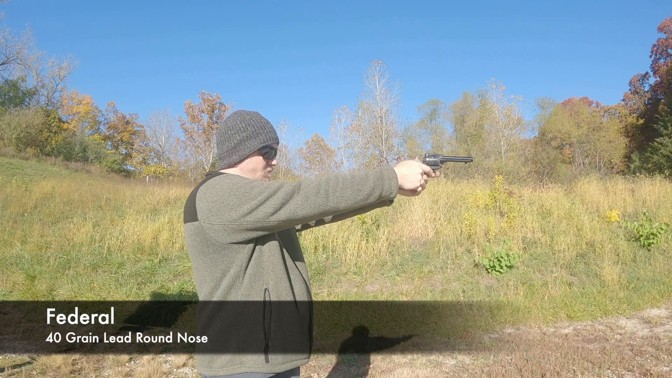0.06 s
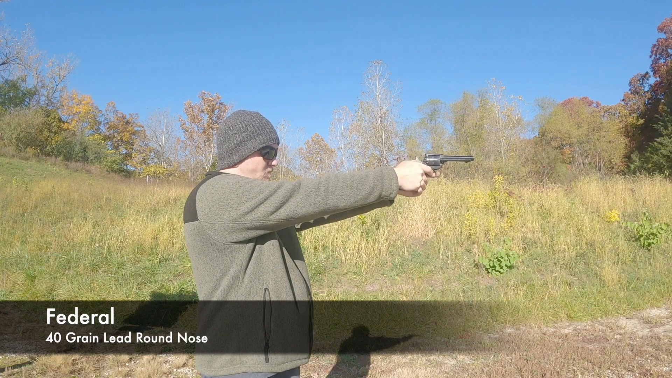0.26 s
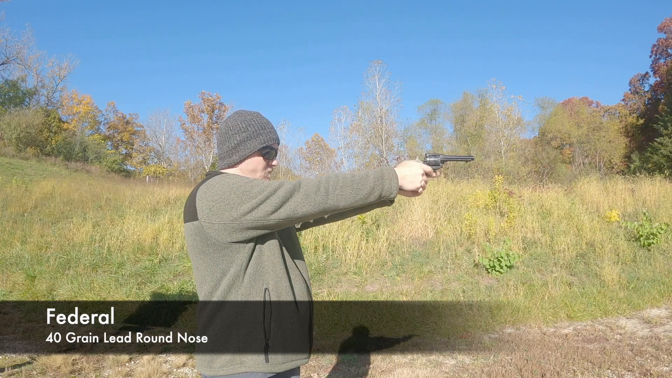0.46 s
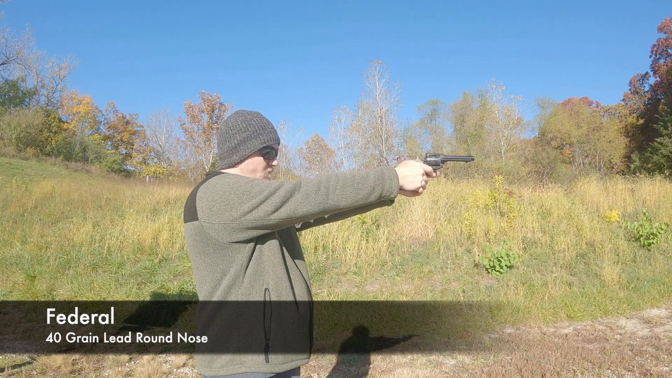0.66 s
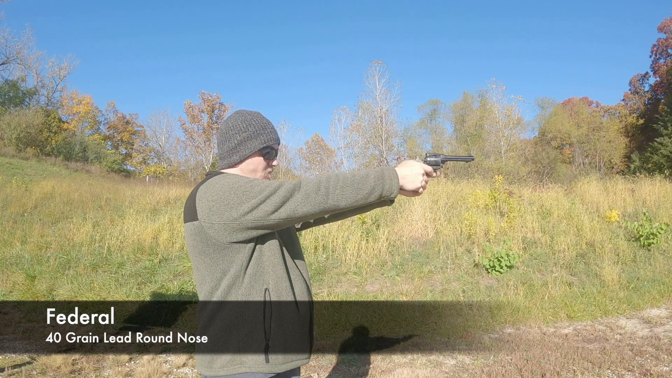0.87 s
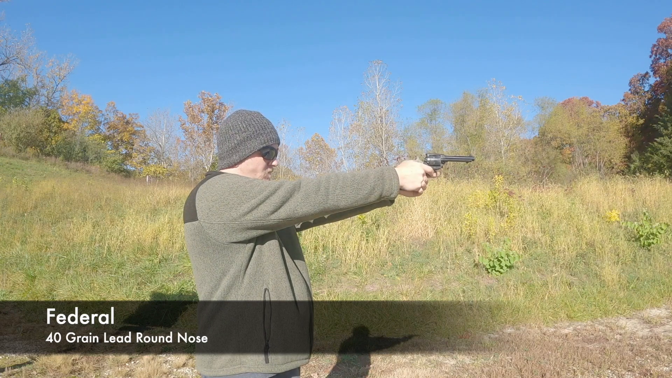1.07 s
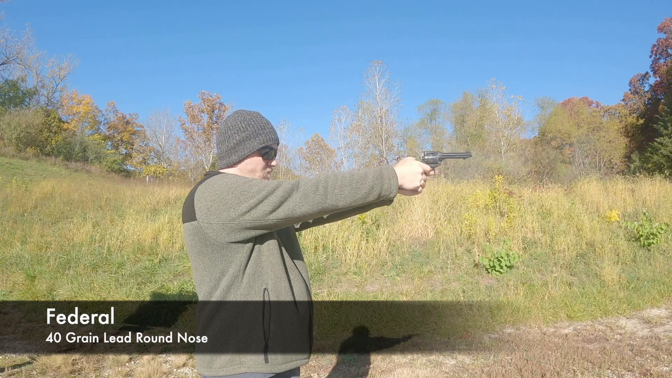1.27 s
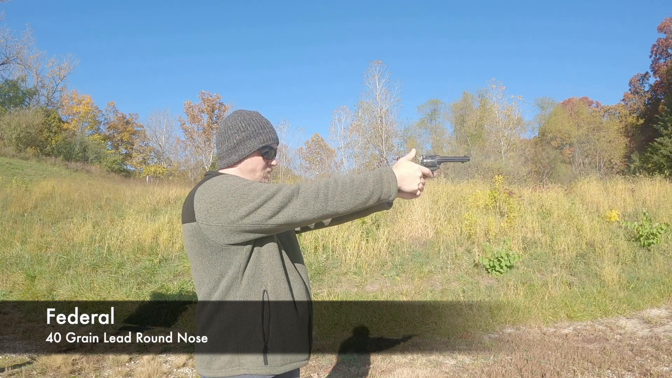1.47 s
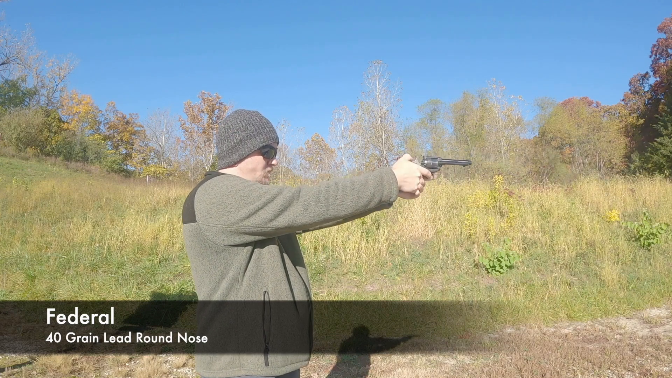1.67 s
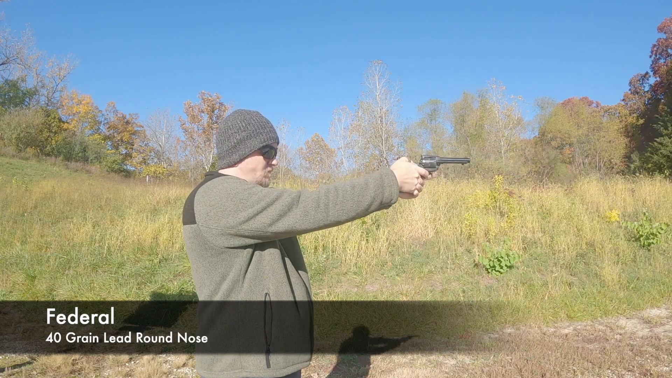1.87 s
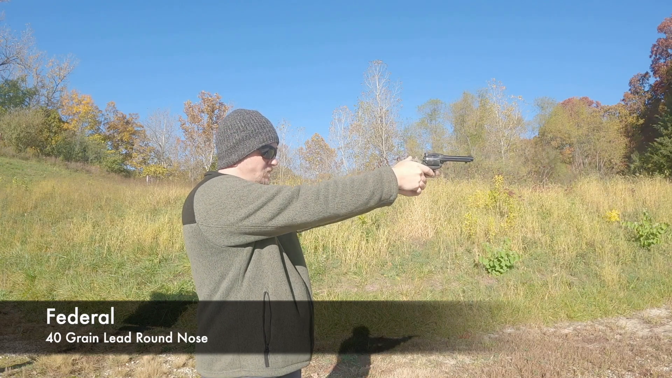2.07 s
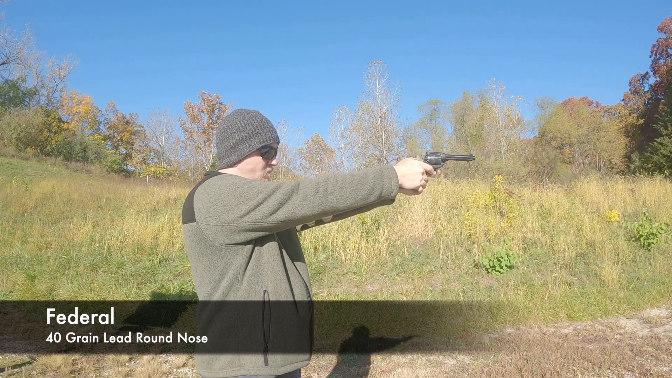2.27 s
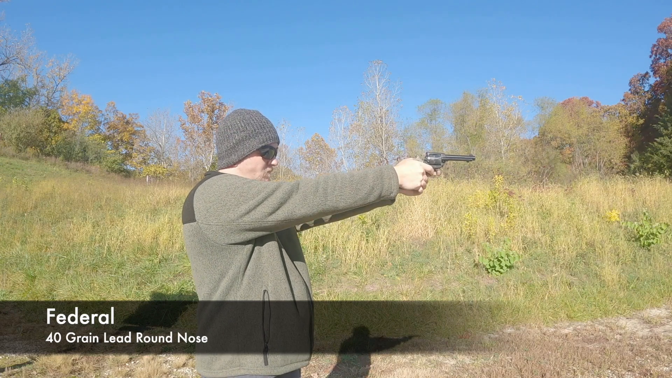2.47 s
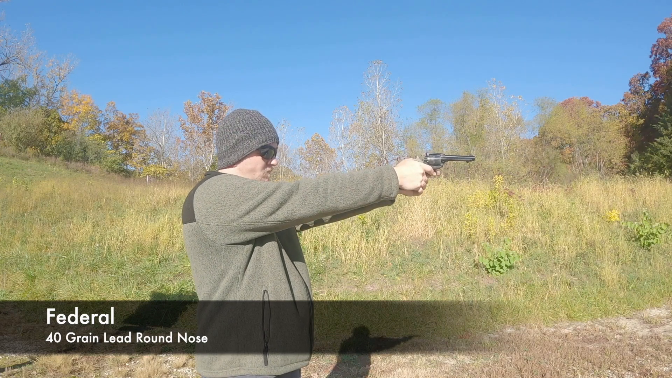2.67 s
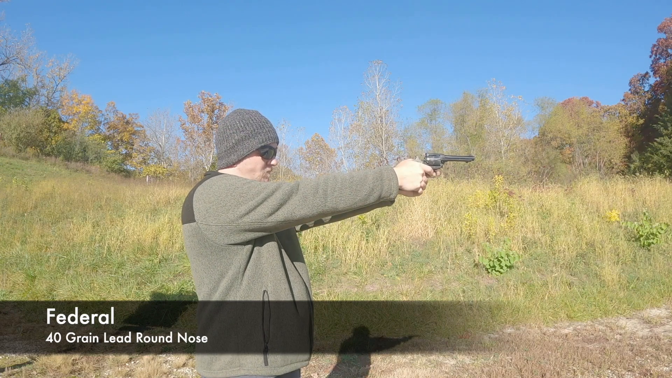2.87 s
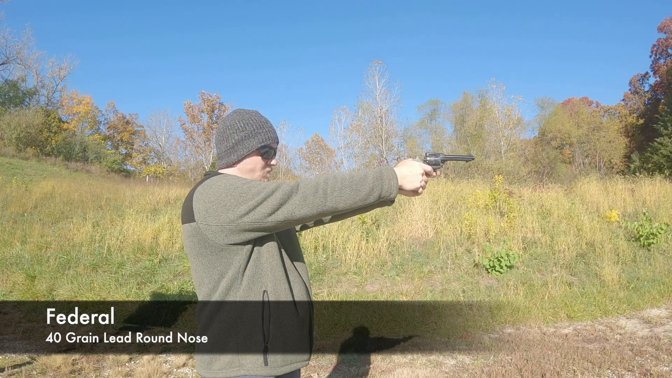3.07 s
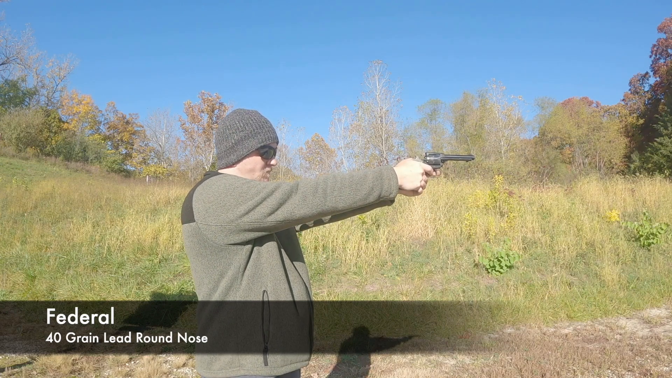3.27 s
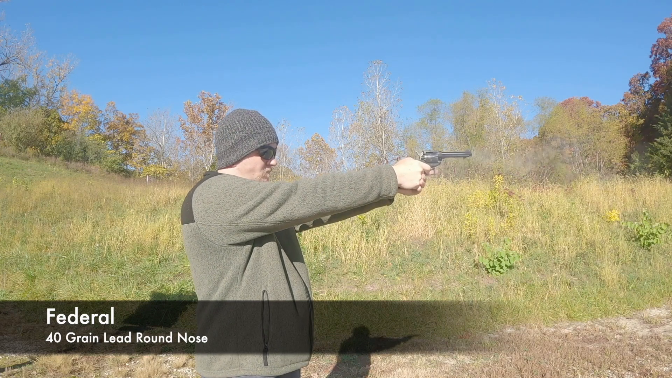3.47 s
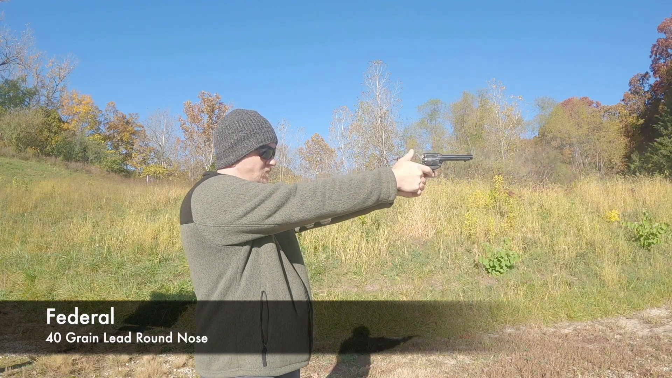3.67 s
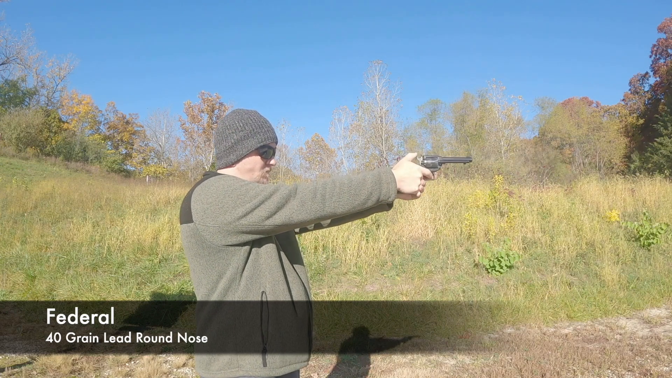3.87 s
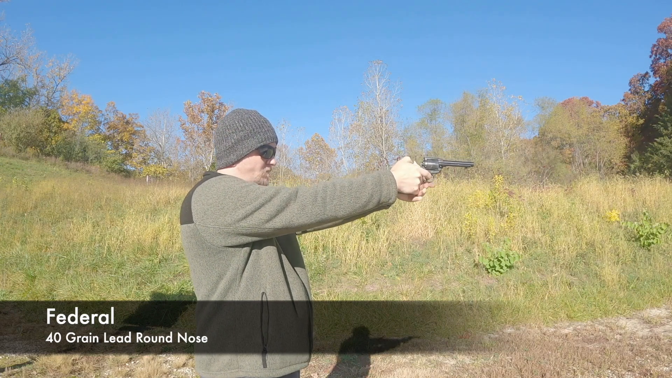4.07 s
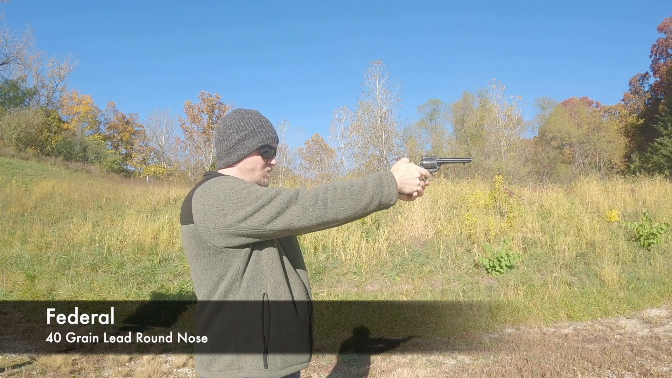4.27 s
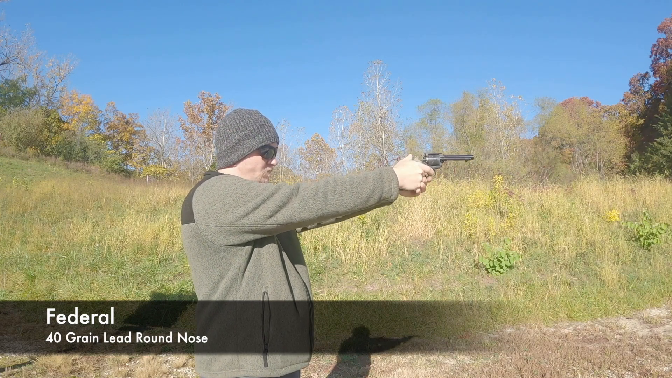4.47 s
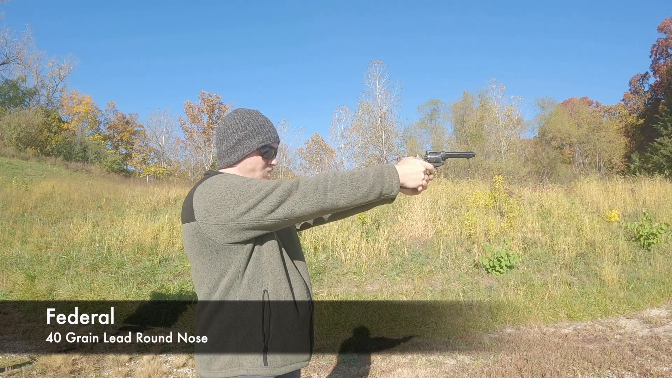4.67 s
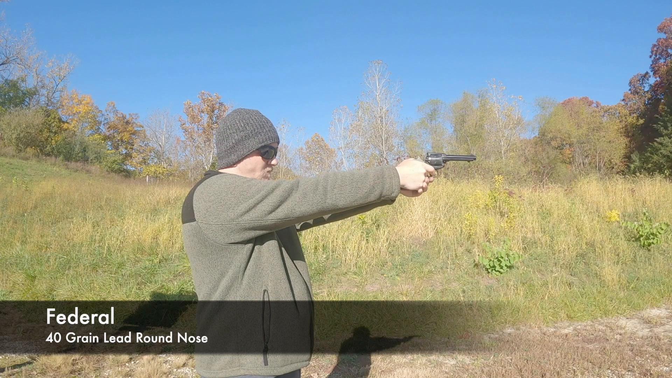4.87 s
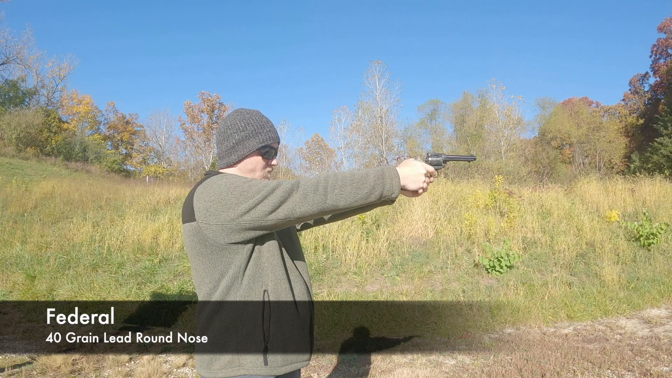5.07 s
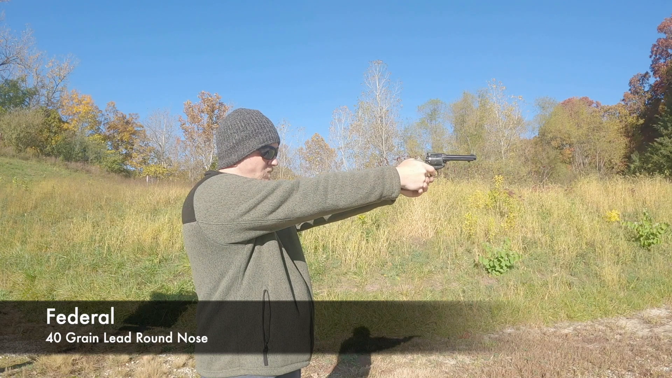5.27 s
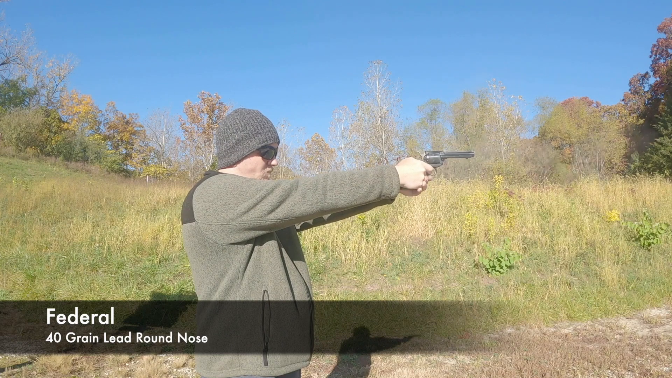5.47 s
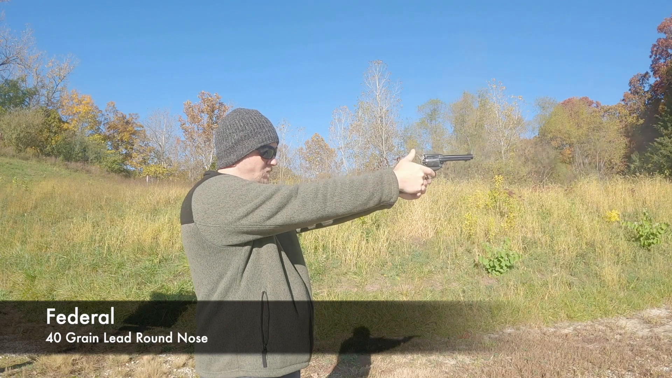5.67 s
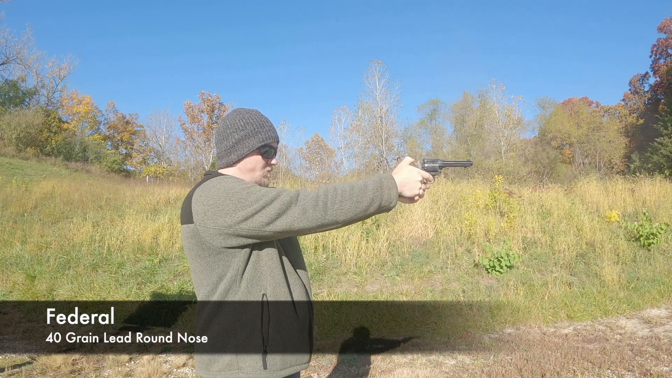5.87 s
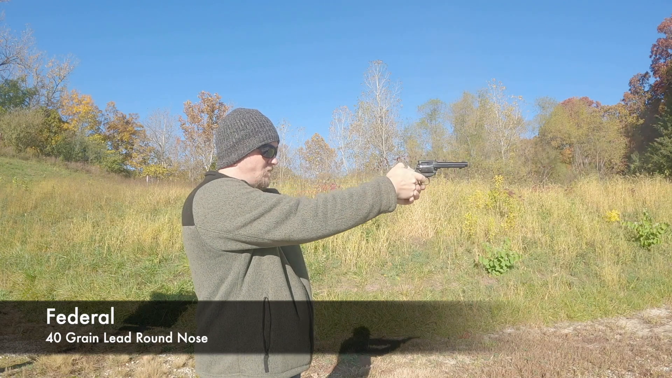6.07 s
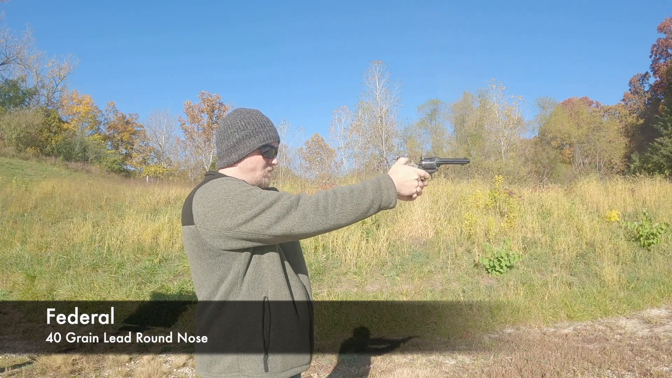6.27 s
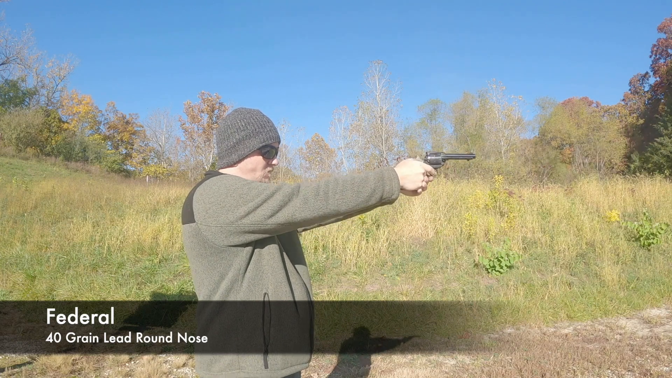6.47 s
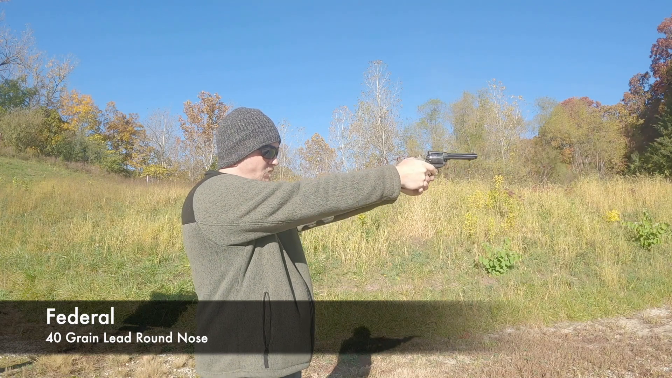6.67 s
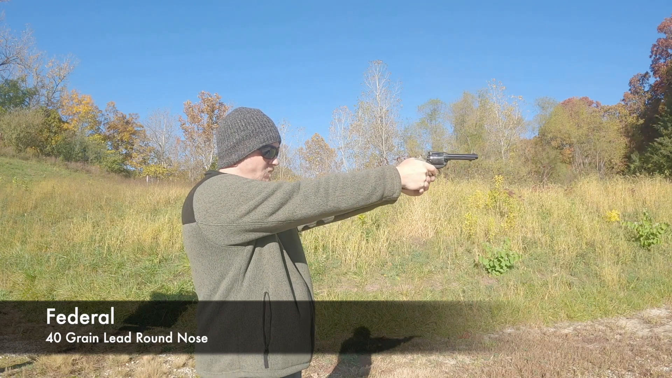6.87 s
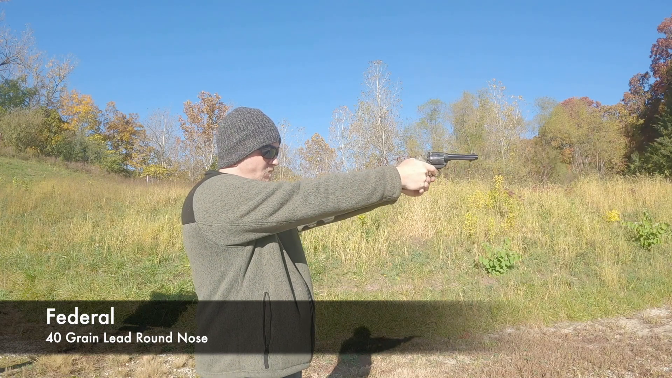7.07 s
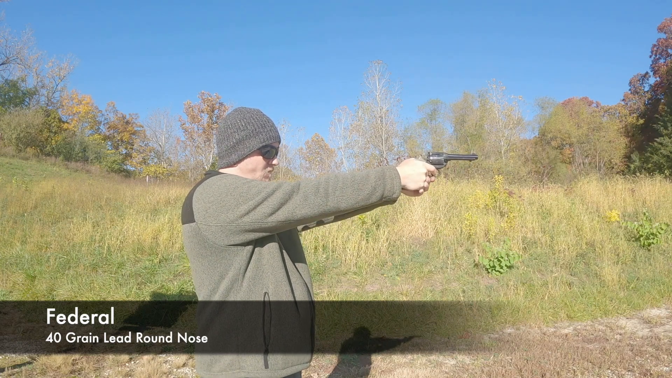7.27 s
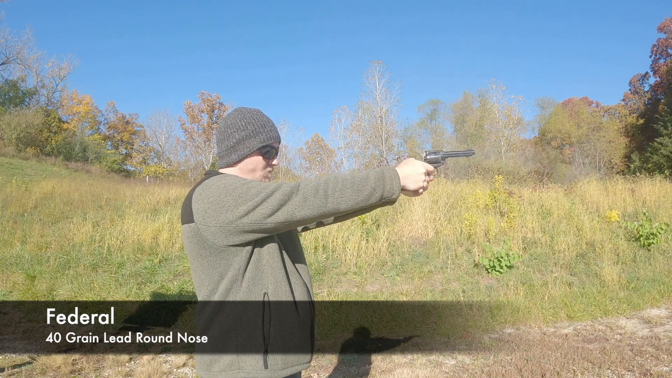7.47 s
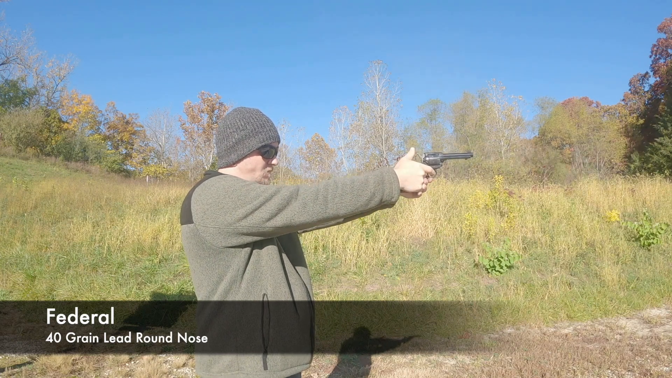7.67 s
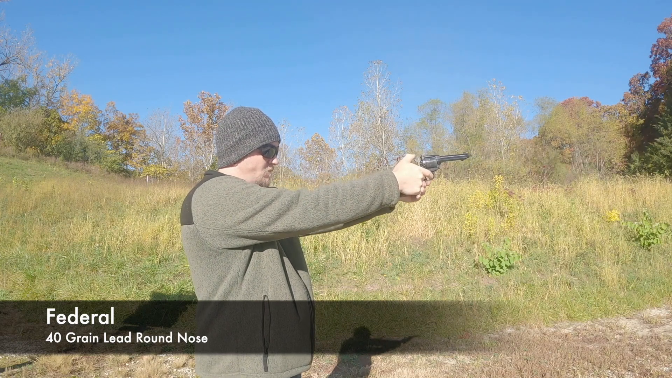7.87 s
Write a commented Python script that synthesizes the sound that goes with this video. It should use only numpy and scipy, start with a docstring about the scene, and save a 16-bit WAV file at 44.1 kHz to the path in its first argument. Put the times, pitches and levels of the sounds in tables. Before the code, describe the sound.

The take opens on the dying woodland echo of an earlier gunshot, over a soft distant rush, thin bird whistles near seven kilohertz and a very faint insect trill. At about 1.2 seconds a small revolver fires close by: a hard, bright, overloaded crack with a tiny stutter of duller copies just before it, a short low boom, then a slap from an earth bank and a dry bullet snap about 0.14 seconds later. The echo swells at the tree line and rolls away. From 1.7 to 2.0 seconds the hammer is cocked in crisp steel clicks. Further shots follow at 3.5, 5.5 and 7.5 seconds, with cocking around 4.0-4.4 and 5.9-6.3. Birds slide up and sag between shots, notably around 2.5-3.5 and 4.2-5.3, with one near 6.8; a faint high insect hiss grows later. The last echo is still rolling at the end. The image is nearly mono.

```python
"""A meadow before woods: a small revolver fires four times close to an overloaded, nearly mono microphone.
The echoes of an earlier shot open the take. Each report is shocks, gas noise and ringing modes, led by a
stutter of duller copies; shaped noise slaps back from an earth bank and rolls through the woods. Bullets snap
on a backstop and steel modes ring as the hammer is cocked. Farther off, birds whistle in gliding sines and
insects trill and hiss in narrow noise over a soft, distant rush."""
import sys
import numpy as np
from scipy import signal
from scipy.fft import rfft, irfft, next_fast_len
from scipy.io import wavfile
from scipy.ndimage import uniform_filter1d, map_coordinates

SR = 44100
rng = np.random.default_rng(int(sys.argv[2]) if len(sys.argv) > 2 else 0)


def bounce(signal):
    """Save signal as a 16-bit WAV file at the path given by the first command-line argument."""
    frames = np.transpose(np.atleast_2d(signal))
    limited = np.clip(frames, -1, 1)
    pcm = np.round(limited * 32767).astype(np.int16)
    wavfile.write(sys.argv[1], SR, pcm)


N = 348831  # samples
TIME = np.arange(N) / SR  # s


def amp(db):
    """Amplitude of a level in dB."""
    return 10 ** (np.asarray(db) / 20)


def unit(x):
    """x scaled to rms 1."""
    return x / np.sqrt(np.mean(x ** 2) + 1e-20)


def along(points, hz):
    """(frequency, value) points interpolated on a log frequency axis."""
    f, v = np.transpose(points)
    return np.interp(np.log(hz + 1), np.log(f + 1), v)


def filtered(x, response):
    """x times a response of frequency."""
    n = x.shape[-1]
    padded = next_fast_len(n + 8192)
    spectrum = rfft(x, padded) * response(np.fft.rfftfreq(padded, 1 / SR))
    return irfft(spectrum, padded)[..., :n]


def coloured(x, points):
    """x through a causal, minimum-phase filter with the given (Hz, dB) shape."""
    size = 4096
    cepstrum = irfft(np.log(amp(along(points, np.fft.rfftfreq(size, 1 / SR)))))
    # fold the cepstrum forward in time
    cepstrum[1:size // 2] *= 2
    cepstrum[size // 2 + 1:] = 0
    impulse = irfft(np.exp(rfft(cepstrum)))
    return signal.fftconvolve(x, impulse)[:len(x)]


def noise(points, size):
    """Noise of rms 1 with the given (Hz, dB) shape."""
    return unit(filtered(rng.standard_normal(size), lambda hz: amp(along(points, hz))))


def wobble(rate, size):
    """A smooth random curve, rate knots a second."""
    knots = rng.standard_normal(int(size * rate / SR) + 4)
    return map_coordinates(knots, [np.arange(size) * rate / SR])


def fade(t, t60):
    """Exponential decay by 60 dB in t60 seconds."""
    return np.exp(-np.log(1000) * t / t60)


def ring(modes, t, scatter_db):
    """Damped modes, each struck at a slightly new strength."""
    total = np.zeros(len(t))
    for hz, db, t60 in modes:
        strength = amp(db + scatter_db * rng.standard_normal())
        total += strength * fade(t, t60) * np.sin(2 * np.pi * hz * t)
    return total


def add(track, s, sound):
    """Mix a sound into the track at time s, cut at the ends of the track."""
    start = round(s * SR)
    lo, hi = max(start, 0), min(start + len(sound), len(track))
    if hi > lo:
        track[lo:hi] += sound[lo - start:hi - start]


# Colour of the scatter from the woods: (frequency [Hz], relative level [dB])
WOODS_TONE = [(50, -43), (110, -31), (200, -13.5), (350, -.5), (750, 0.5), (1200, -1.5), (1700, -.5),
              (3200, 1.5), (5500, -6.3), (7800, -16), (9500, -23.5), (15000, -44)]
# Loss to ground and air on the way: (frequency [Hz], loss [dB per s])
PATH_LOSS = [(80, 21.5), (250, 8), (600, -2.5), (1700, 4.5), (3500, 16), (6000, 28), (12000, 45)]
# The woods answer from the nearest brush on, loudest at the tree line (s after the shot)
BRUSH_S, TREELINE_S, WOODS_RISE_DB_PER_S = .13, .26, 137.5
TREELINE_DB, TREELINE_T60_S = -25.5, .85  # the front row of trees
FOREST_DB, FOREST_T60_S = -32.5, 3.87  # the depth behind it


def woods(trunks):
    """Trunks scatter the blast, swelling to the tree line; longer paths lose more treble and bass."""
    t = np.arange(len(trunks)) / SR
    before, behind = np.maximum(TREELINE_S - t, 0), np.maximum(t - TREELINE_S, 0)
    rise = (t > BRUSH_S) * amp(-WOODS_RISE_DB_PER_S * before)
    front = amp(TREELINE_DB) * fade(behind, TREELINE_T60_S)
    depth = amp(FOREST_DB) * fade(behind, FOREST_T60_S)
    scatter = rng.standard_normal(len(t)) * trunks * rise * np.hypot(front, depth)
    hz, delay, z = signal.stft(scatter, SR, nperseg=1024)
    tone = unit(amp(along(WOODS_TONE, hz)))[:, None]
    lost = amp(-along(PATH_LOSS, hz)[:, None] * delay)
    # random strong and weak patches in frequency, then time
    patches = uniform_filter1d(rng.standard_normal(z.shape), size=8, axis=0)
    patches = unit(uniform_filter1d(patches, size=3, axis=1))
    return signal.istft(z * tone * lost * amp(1.6 * patches), SR, nperseg=1024)[1]


# Shots, the first heard only by its last echoes:
# (time [s], blast level [dB], echo level [dB], blast brightness [dB per octave])
SHOTS = [(-.95, 0, .5, 0), (1.228, 0, 0, -.3), (3.5092, 1, .6, -.6), (5.4797, .3, -.5, 0),
         (7.5044, -.5, 1.5, 1)]
# Colour of the scatter from ground and grass: (frequency [Hz], relative level [dB])
MEADOW_TONE = [(30, -17), (100, -5.5), (200, 2.5), (320, 6.5), (520, -2.5), (850, -13), (1600, -5.5),
               (4000, -9.5), (6500, -16), (10000, -26), (15000, -34.5)]
# Distinct returns from the earth bank, the edge of the woods and a far slope:
# (delay [s], level [dB], swell [s], centre [Hz], width [octaves])
BANK = [(.129, -30.5, 0.00207, 1600, 1.58), (.139, -38, 0.0042, 305, 0.76), (.167, -38, 0.0042, 260, .8),
        (.182, -38.5, 0.0043, 200, 0.83), (.445, -38, .007, 700, .7), (.95, -51, 0.11, 600, 0.57)]
GROUND_DB, GROUND_T60_S = -18.5, .08  # the ground at the shooter's feet
GRASS_DB, GRASS_T60_S = -37.5, .46  # the open grass


def echoes():
    """Grass answers first, then bank, woods and far slope, each as noise with its own colour and decay."""
    out, t = np.zeros(N), np.arange(SR // 2) / SR
    size = SR * 5 // 2
    # the same trees answer every shot; uneven ground returns each blast in the same lumps
    trunks = unit(amp(1.4 * wobble(900, size=size) + .9 * wobble(120, size=size)))
    hummocks = unit(amp(2.1 * wobble(70, size=len(t))))
    meadow = np.hypot(amp(GROUND_DB) * fade(t, GROUND_T60_S), amp(GRASS_DB) * fade(t, GRASS_T60_S))
    for s, _, db, _ in SHOTS:
        add(out, s, amp(db) * hummocks * noise(MEADOW_TONE, size=len(t)) * meadow)
        add(out, s, amp(db) * woods(trunks))
        for lag, return_db, swell, centre_hz, octaves in BANK:
            def band(hz):
                return np.exp(-(np.log2((hz + 1) / centre_hz) / octaves) ** 2)
            rush = unit(filtered(rng.standard_normal(len(t)), band))
            envelope = t / swell * np.exp(1 - t / swell)  # peaks at 1 after the swell time
            add(out, s + lag, amp(db + return_db) * rush * envelope)
    return out


# Bird whistles: (time [s], length [s], held pitch [Hz], peak level [dB])
WHISTLES = [(-.25, .65, 7060, -74), (.18, 0.44, 7000, -65.5), (0.642, 0.59, 7080, -69.5),
            (0.967, 0.32, 7000, -67.5), (2.503, 0.7, 7170, -66.5), (2.953, 0.51, 7100, -69.5),
            (3.237, .28, 7030, -69.5), (4.18, 0.86, 7060, -71), (4.797, 0.46, 7400, -74),
            (4.844, 0.43, 7100, -65), (5.28, 0.24, 7060, -72), (6.76, .38, 7270, -71)]
SCOOP_HZ, SCOOP_S = 654, .067  # start below the held pitch, time constant of the slide up
DROOP_HZ, HOARSE_HZ = 130, 40  # sag at the end, random waver


def birds():
    """Thin, slightly hoarse sine whistles that slide up to a held pitch and sag as they end."""
    out = np.zeros(N)
    for s, length, held_hz, db in WHISTLES:
        t = np.arange(int(length * SR)) / SR
        u = t / length
        glide = -SCOOP_HZ * np.exp(-t / SCOOP_S) - DROOP_HZ * u ** 3
        hz = held_hz + glide + HOARSE_HZ * wobble(200, size=len(t))
        add(out, s, amp(db) * np.sin(np.pi * u) * np.sin(2 * np.pi * np.cumsum(hz) / SR))
    return out


# Levels of the two insects before the recorder's gain recovers:
# (time [s], trill level [dB], hiss level [dB])
INSECTS = [(0, -93.5, -113), (3, -90.5, -112), (5.001, -93, -102), (7.001, -99, -94)]
GAIN_RECOVERY_DB_PER_S, STROKE_HZ = 8.5, 27.3  # gain recovery after a shot; wing strokes a second


def insects():
    """One insect trills in even wing strokes, another hisses above; the recorder's gain on them
    drops at each shot and recovers."""
    s, trill_db, hiss_db = np.transpose(INSECTS)
    fired = np.array(SHOTS)[:, 0]
    since_shot = TIME - fired[np.searchsorted(fired, TIME) - 1]
    # a squared sine at half rate gives one pulse per stroke
    strokes = np.sin(np.pi * np.cumsum(STROKE_HZ + .2 * wobble(1.7, size=N)) / SR) ** 2
    trill_tone = [(6400, -49), (7200, -3.5), (7500, -2), (7850, -13.5), (8600, -48)]
    hiss_tone = [(9500, -39), (10900, -.5), (11400, 1.5), (12000, -9), (14000, -35)]
    trill = amp(np.interp(TIME, s, trill_db)) * unit(strokes * noise(trill_tone, size=N))
    hiss = amp(np.interp(TIME, s, hiss_db)) * noise(hiss_tone, size=N)
    return amp(GAIN_RECOVERY_DB_PER_S * since_shot) * (trill + hiss)


# Colour of the distant rush: (frequency [Hz], relative level [dB])
AIR_TONE = [(25, -28.5), (90, -36), (160, -12), (300, -11), (620, -3.5), (1000, -7), (1600, -11.5),
            (3000, -19), (5000, -30), (7000, -30.5), (9000, -43), (15000, -52)]


def air():
    """The soft rush of the open country: coloured noise with a gently wavering level."""
    return amp(-60.5 + .6 * wobble(5.9, size=N)) * noise(AIR_TONE, size=N)


def shock(t, ms):
    """A pulse of unit area arriving after about ms; bending round the shooter blunts the later ones."""
    width = 2e-5 * (1 + 1.3 * abs(ms))  # s
    pulse = np.exp(-((t - ms / 1000 - rng.normal(6e-5, 1e-5)) / width) ** 2)
    return pulse / (pulse.sum() + 1e-9)


# Paths of the blast and its suction phase, by cylinder gap, muzzle, arms and body, ground:
# (delay [ms], relative pressure)
PATHS = [(0, 0.93), (.2, -.7), (.6, 0.51), (1.6, -0.83), (2.0, .4), (2.6, 0.48), (6.5, -0.43)]
# Colour of the blast before the shot's own brightness: (frequency [Hz], level [dB])
BLAST_TONE = [(30, 3), (90, 12), (170, 26), (350, 24), (550, 24.5), (850, 24), (1080, 14), (1480, 24.5),
              (2100, 24), (2700, 21), (3500, 21), (5000, 25), (8500, 9), (15000, -8)]
# Low ring of the report: (frequency [Hz], level [dB], t60 [s])
BOOM = [(150, -18, 0.026), (255, -18, 0.062), (315, -13, 0.041), (518, -19, 0.023)]


def report(tilt):
    """Pressure pulses by several paths, a burst of turbulent gas and a short boom just behind them."""
    t = np.arange(SR // 8) / SR
    shocks = sum(size * shock(t, ms) for ms, size in PATHS)
    gas_envelope = amp(-22.5) * fade(t, .0078) + amp(-40.5) * fade(t, .032)
    gas = rng.standard_normal(len(t)) * gas_envelope
    tone = [(hz, db + tilt * np.log2(hz / 1000)) for hz, db in BLAST_TONE]
    crack = coloured(shocks + gas, tone)
    add(crack, .001, ring(BOOM, t, scatter_db=1.6))
    return crack


# Filter that dulls the stutter copies: (frequency [Hz], gain [dB])
STUTTER_TONE = [(40, -9), (140, 6.5), (400, 2.5), (850, 4.5), (1500, -2), (3000, -2.5), (5400, -3),
                (6800, -18.5), (9000, -17), (10500, -28.5)]
# Colour of the hollow swell between them: (frequency [Hz], relative level [dB])
SWELL_TONE = [(40, -18.5), (150, -3), (230, -3), (340, -3.5), (600, -6.5), (900, -1.5), (1150, -13),
              (3000, -16.5), (5200, -20), (6500, -34.5), (8400, -33.5), (9000, -21.5), (9700, -47)]
STUTTER_S = .01067  # even spacing of the copies
STUTTER_DB, STUTTER_FALL_DB = -2.5, 2.1  # top; fall with the square of the number of steps ahead


def blasts():
    """Each report is led by duller copies, alternating in sign, and a hollow noise swell between them."""
    out = np.zeros(N)
    ahead = np.arange(SR // 20, 0, -1) / SR  # time left until the report, s
    for s, db, _, tilt in SHOTS:
        crack = amp(db) * report(tilt)
        dull = coloured(crack, STUTTER_TONE)
        add(out, s, crack)
        for k in range(1, 5):
            level = amp(STUTTER_DB - STUTTER_FALL_DB * k ** 2)
            add(out, s - k * STUTTER_S, (-1) ** k * level * dull)
        hump = np.exp(-((ahead - .008) / .016) ** 2)
        swell = amp(db - 17.5) * hump * (1 - fade(ahead, .0053))
        add(out, s - ahead[0], swell * noise(SWELL_TONE, size=len(ahead)))
    return out


# Bullets strike the backstop: (time [s], level [dB])
STRIKES = [(1.3705, -29.5), (3.642, -37), (5.6201, -21), (7.637, -36)]
# Colour of the snap: (frequency [Hz], relative level [dB])
STRIKE_TONE = [(50, -16), (150, -3), (350, 1), (1200, -18.5), (3000, -3), (6000, -7), (9000, -22.5),
               (15000, -42)]


def bullets():
    """A dry snap comes back from the backstop: noise with a fast decay and a faint tail."""
    out, t = np.zeros(N), np.arange(SR // 10) / SR
    for s, db in STRIKES:
        envelope = fade(t, .011) + amp(-17.5) * fade(t, .047)
        add(out, s, amp(db) * noise(STRIKE_TONE, size=len(t)) * envelope)
    return out


# The thumb draws the hammer back; after a pause the action clicks once more:
# (time [s], pull [s], pause [s])
COCKING = [(1.6826, .1383, .1909), (4.0105, .1966, .2079), (5.9252, .1835, .1863)]
# First notch, second notch, full cock, cylinder stop: (tick level [dB], frame ring level [dB])
CATCHES = [(-31.5, -23), (-43, -43), (-33, -15.5), (-33, -34.5)]
# Modes of the steel frame: (frequency [Hz], relative level [dB], t60 [s])
STEEL = [(3000, -5.5, 0.0097), (3280, 0.5, 0.0041), (3680, -18, 0.0038), (5800, -23, 0.0064),
         (7070, -28, 0.0093), (10800, -14.5, 0.0051)]
# Colour of the ticks: (frequency [Hz], relative level [dB])
CLICK_TONE = [(300, -8), (2200, -6), (3300, 8), (4500, 19.5), (7500, 7), (9500, -4), (11200, 2),
              (15000, -25)]
SECOND_NOTCH = .385  # share of the pull


def hammer():
    """Steel catches snap in the same order every time and ring the frame, which the hands damp at once."""
    out, t = np.zeros(N), np.arange(SR // 8) / SR
    for s, pull, pause in COCKING:
        lags = [0, SECOND_NOTCH * pull, pull, pull + pause]
        for lag, (tick_db, ring_db) in zip(lags, CATCHES):
            decay = fade(t, .0061) + amp(-22.5) * fade(t, .078)
            tick = amp(tick_db) * noise(CLICK_TONE, size=len(t)) * decay
            frame = amp(ring_db) * ring(STEEL, t, scatter_db=.5)
            add(out, s + lag, (tick + frame) * (1 - fade(t, .0022)))  # soft onset
    return filtered(out, lambda hz: hz / (hz + 500))  # so small a frame radiates no bass


# Stereo width of near sounds: (frequency [Hz], side level [dB])
WIDTH = [(1200, -55), (2400, -31), (4400, -20), (8100, -17), (14000, -10)]
FAR_WIDTH_DB = -10  # distant sounds are narrower still


def scene():
    """All is ahead of the microphone; mostly the treble differs in phase between channels, most for the gun."""
    far = echoes() + birds() + insects() + air() + bullets()
    near = blasts() + hammer()
    mid = near + far
    side = filtered(near + amp(FAR_WIDTH_DB) * far,
                    lambda hz: amp(along(WIDTH, hz)) * np.exp(1j * 1.4))  # phase in radians
    return np.array([mid + side, mid - side])


# Response of the microphone: (frequency [Hz], gain [dB])
MICROPHONE = [(20, -10), (70, -1), (8000, -0.5), (10000, -7.5), (13000, -5.5)]
MONO_BELOW_HZ, TOP_HZ = 1800, 15600


def record(dry):
    """The blast overloads the input; bass goes mono, deep bass and top treble droop, up to a band limit."""
    left, right = dry / (1 + abs(dry / .97) ** 6) ** (1 / 6)  # rounds off below .97
    mid = (left + right) / 2
    side = filtered((left - right) / 2, lambda hz: 1 - 1 / (1 + (hz / MONO_BELOW_HZ) ** 4))

    def response(hz):
        return amp(along(MICROPHONE, hz)) / np.sqrt(1 + (hz / TOP_HZ) ** 300)
    return filtered(np.array([mid + side, mid - side]), response)


dry = scene()
out = record(dry)
bounce(out)
```